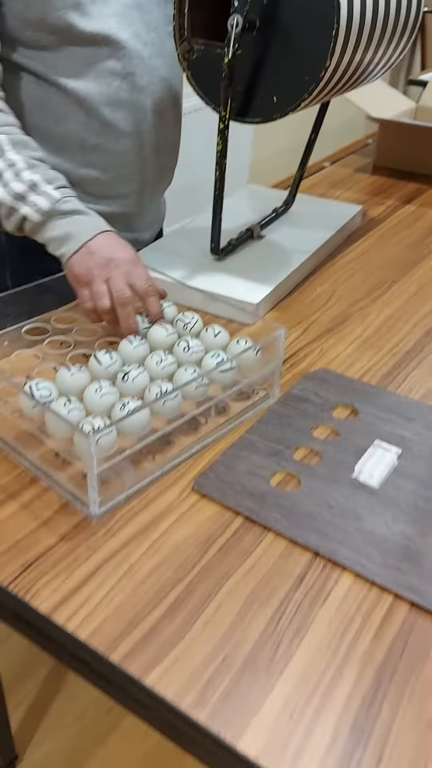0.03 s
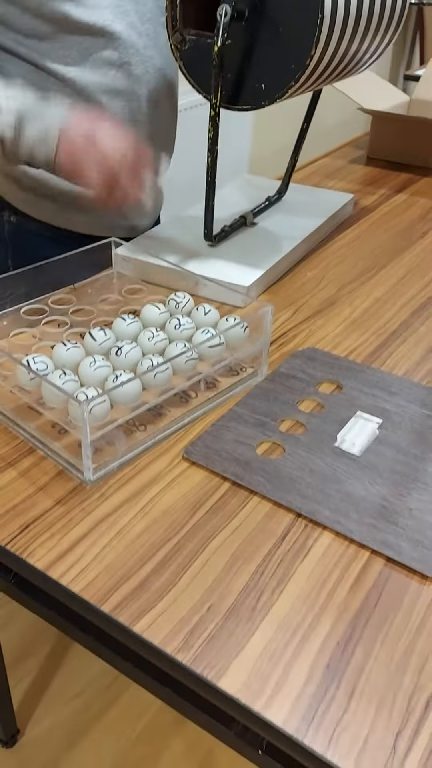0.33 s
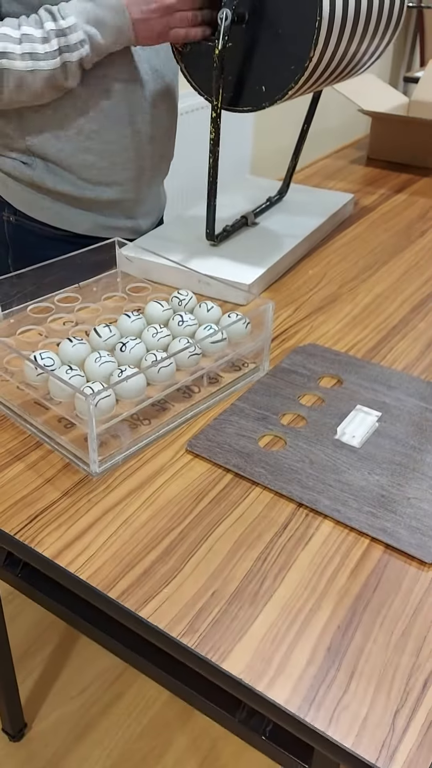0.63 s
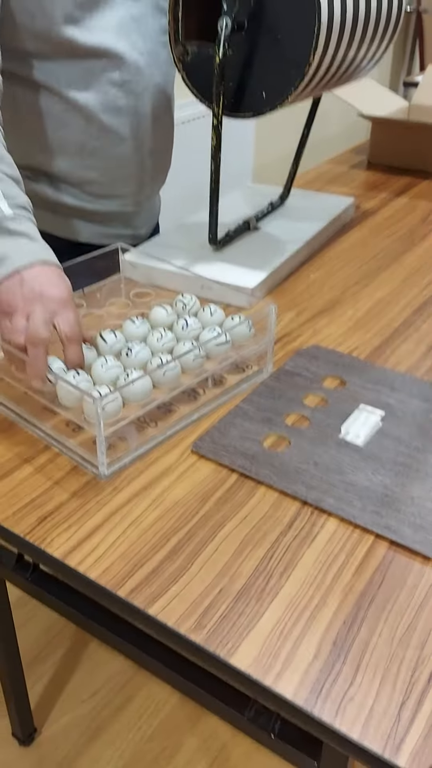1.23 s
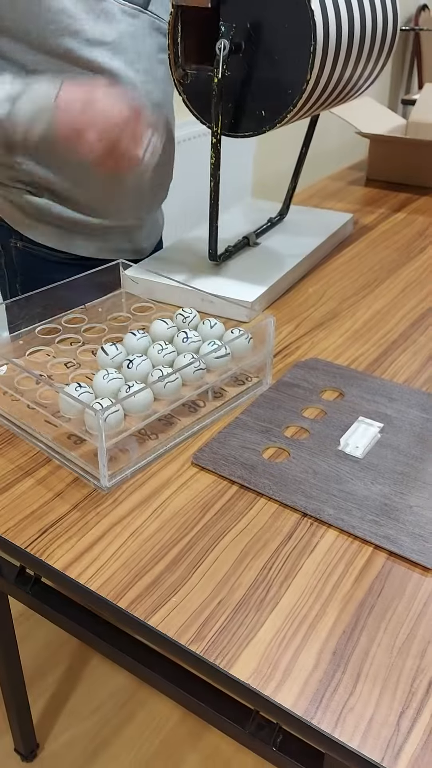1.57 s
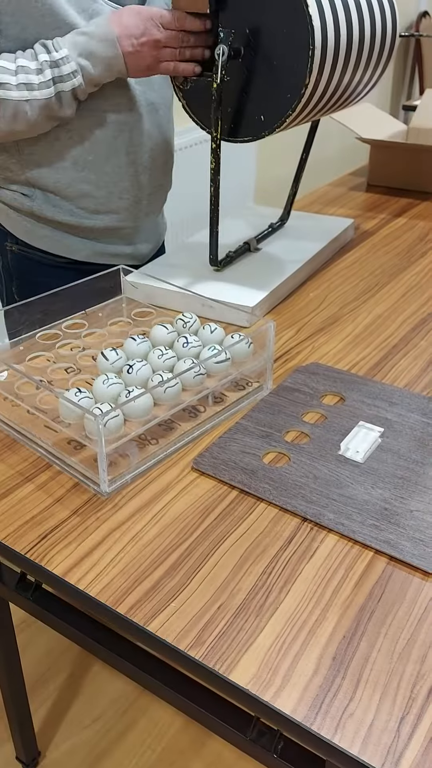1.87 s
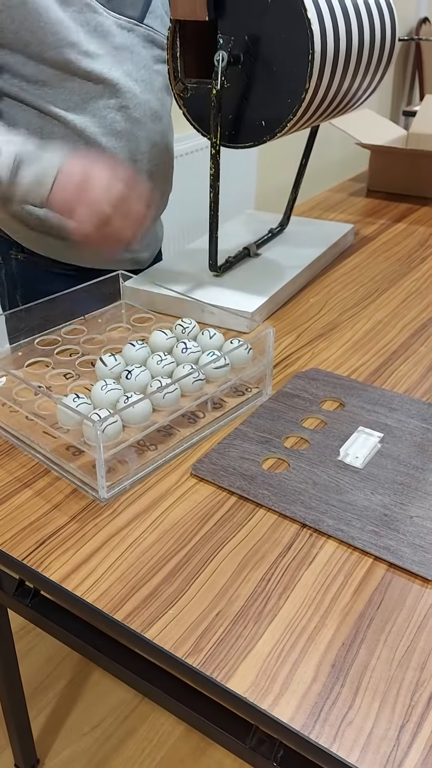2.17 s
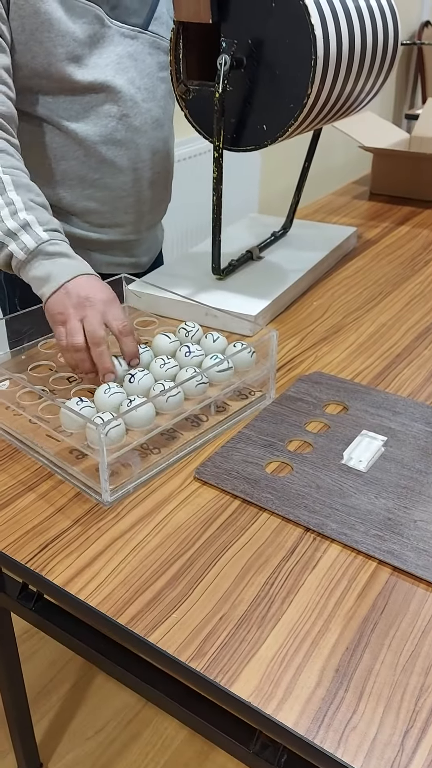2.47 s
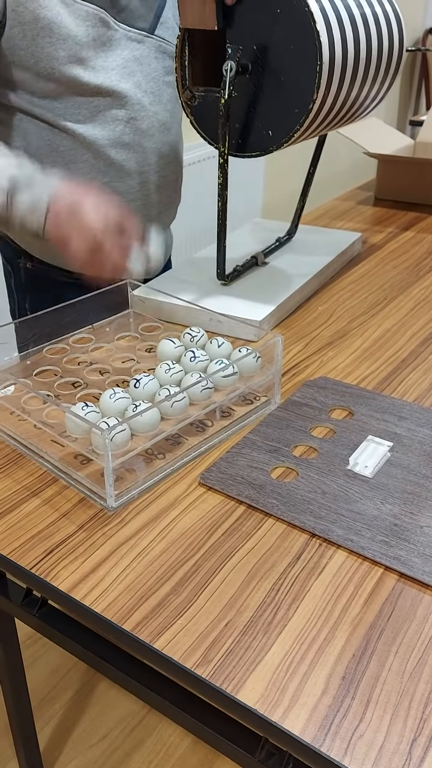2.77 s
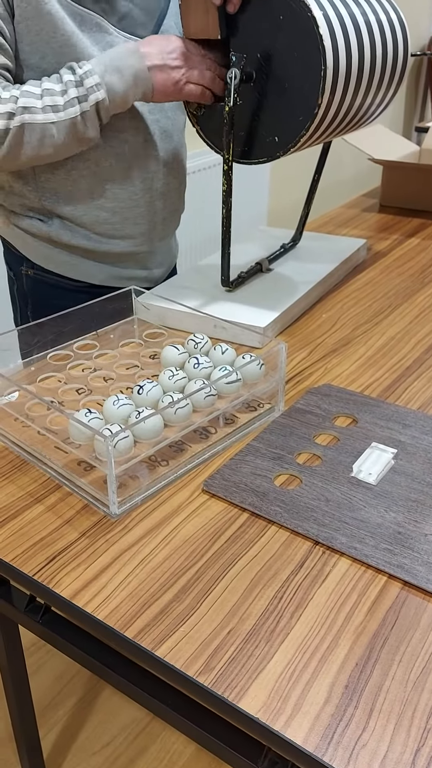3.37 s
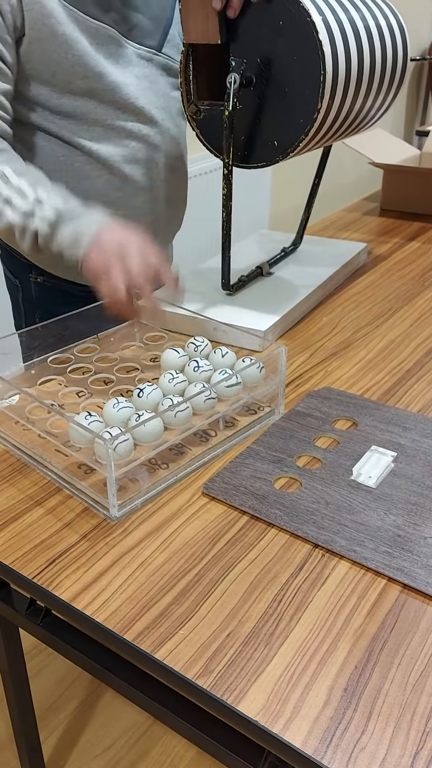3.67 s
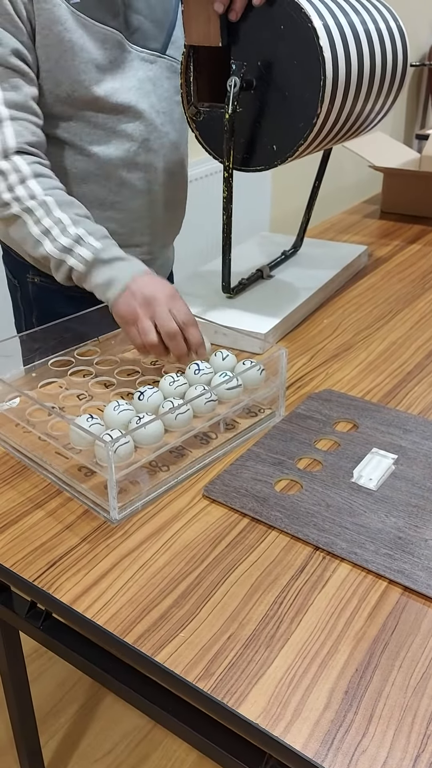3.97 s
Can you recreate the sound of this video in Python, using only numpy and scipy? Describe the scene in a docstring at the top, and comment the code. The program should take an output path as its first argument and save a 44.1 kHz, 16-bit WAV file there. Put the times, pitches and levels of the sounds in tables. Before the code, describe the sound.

Small balls rattle inside a hollow lottery drum, dropped in through a knocking wooden hatch.

```python
"""Fingers knock light, hard balls about in a plastic tray. Three times a wooden hatch knocks and a ball
drops into a hollow lottery drum, where it bounces, clacks and rolls among the others; the hand goes back
to the tray. Each blow on a body is a contact pulse, a short dense ring and mostly a few clear modes.
A bare, ringing room with faint noise surrounds a two-port microphone about a metre away."""
import sys
import numpy as np
from scipy import signal
from scipy.fft import rfft, irfft, next_fast_len
from scipy.io import wavfile
from scipy.ndimage import uniform_filter1d

SR = 44100
rng = np.random.default_rng(int(sys.argv[2]) if len(sys.argv) > 2 else 0)


def file_out(sig):
    """Save sig as 16-bit WAV at sys.argv[1]."""
    # one column per channel
    cols = np.atleast_2d(sig).T
    # limit, then scale
    lim = np.clip(cols, -1, 1)
    pcm = np.round(lim * 32767).astype(np.int16)
    wavfile.write(sys.argv[1], SR, pcm)


N = 176400
RING_TIME_S = np.arange(16384) / SR

# room noise spectrum; gains of direct path, early echoes, tail (f/Hz, level/dB)
AIR_SPECTRUM = [(12, -47), (25, -28), (50, -37), (90, 4.5), (140, 3.5), (300, 5.5), (600, -10),
                (1500, -2.5), (4000, -37), (11000, -28.5), (16000, -8)]
DIRECT_EQ = [(300, 0), (900, -2.5), (5000, -2.5)]
EARLY_EQ = [(150, -10), (700, .5), (8000, -1.5)]
TAIL_EQ = [(100, -3.5), (300, 3.5), (800, 2), (2000, 0), (6000, 3), (12000, -3)]
# tail decay (f/Hz, t60/s)
TAIL_DECAY = [(100, 0.9), (260, 0.8), (700, 0.59), (1800, 0.46), (5000, 0.66), (12000, 0.47)]
# left minus right; microphone response (f/Hz, level/dB)
BALANCE_EQ = [(100, 2), (280, -2), (600, -1.5), (1100, 1.5), (4000, 0.5), (8000, -1), (14000, 5.5)]
MIC_EQ = [(20, -15), (45, 0.5), (4400, 1), (5400, 0), (7000, -1.5), (8300, 4.5), (9050, 5.5), (9350, -8.5),
          (9900, 3), (12500, 4), (14000, -6), (15800, -17)]

# spectral shape of each dense ring (f/Hz, level/dB)
TICK_SPECTRUM = [(2500, -42), (3700, 0.5), (8300, -2), (11000, -8)]
TRAY_SPECTRUM = [(15, -72), (60, -6), (150, -12.5), (260, -6.5), (550, 0.5), (1400, 2), (1950, 0.5),
                 (2700, -10.5), (6000, -24), (11000, -17.5), (16000, -11.5)]
HATCH_SPECTRUM = [(20, -47), (70, -63), (140, -11), (260, -0.5), (550, -0.5), (900, -26), (1500, 7),
                  (2400, -10.5), (4000, -16), (6500, -21.5), (11000, -13.5), (16000, -17)]
SHELL_SPECTRUM = [(200, -25), (1100, 3), (1900, 3), (2500, -6), (3500, -9), (4300, 1), (5200, -9),
                  (7400, 0.5), (10000, -11.5), (16000, -17)]
CLACK_SPECTRUM = [(1000, -18.5), (3000, -9), (6000, -15.5), (10000, -15), (16000, -10.5)]
DRUM_SPECTRUM = [(20, -31), (60, -65), (130, -17.5), (380, -18.5), (560, -0.5), (760, -10.5), (1100, 1.5),
                 (1650, 0), (2300, -6.5), (4000, -15), (6500, -29.5), (11000, -13.5), (16000, -13.5)]
# clear modes (f/Hz, level/dB re dense ring, t60/s)
TRAY_MODES = [(125.3, -22, 0.3), (182, -22, 0.2), (345, -17, 0.08), (1146, -10, 0.034), (1464, -7, 0.03),
              (1867, -13, 0.05)]
HATCH_MODES = [(142, -8, 0.14), (178, -11, 0.08), (233.5, -20, 0.12), (323, -15, 0.06), (841, -4, 0.02),
               (916, -6, 0.03), (1136, -9, 0.03), (1421, -7, 0.035)]
FRAME_MODES = [(146, -9, 0.2), (231, -13, 0.25), (350, -9, 0.12), (1205, -12, 0.15), (1425, -11, 0.3),
               (1745, -11, .2), (1943, -7, 0.4)]
THIN_MODES = [(2500, -9, .06), (2630, -9, .12), (2790, -9, .06)]
DRUM_MODES = [(141, -25, 0.6), (190, -30.5, 0.5), (313.4, -25, 0.2), (535, -14, 0.15), (577, -11, 0.21),
              (721, -21, .1), (892, -11, 0.087), (995, -15, 0.08), (1135, -14, 0.064), (1450, -16, 0.055),
              (2560, -18, 0.059)]
# ball shell modes, relative to each click (f ratio, level/dB, t60 ratio)
SHELL_MODES = [(1, -8, 1), (.985, -8, .4), (1.035, -9, .25), (.96, -9, .25), (1.8, -10, .25)]

# faint, short, high ticks of fingers or cloth (t/s, level/dB)
FAINT_TICKS = [(.4, -34), (2.823, -39.5), (2.856, -35.5), (2.882, -44), (3.751, -19)]
# blows on tray and hatch (t/s, level/dB, treble/dB, bass/dB)
TRAY_TAPS = [(.001, 6, 0, 8.5), (.008, -6, -3, 11), (.024, -2.5, 5, -11), (.055, -12, -8, 20),
             (.08, -5.5, -1, -24), (.132, -21.5, 16.5, -1), (.155, -13.5, -18, -3.5), (.454, -26.5, 2, -13),
             (1.143, 1, -3.5, 1.5), (1.184, -2, -5, 12.5), (1.24, -12, 4, 19), (1.833, 3.5, -11, -31),
             (2.249, -2.5, -7, -24), (2.362, 4.5, -26, -6), (2.368, -5.5, 0.5, 6), (3.759, -5, -1, -2),
             (3.771, -2.5, 2.5, 9), (3.79, -7, 7.5, 7), (3.834, -2.5, 7, 0.5), (3.868, -19, 16, 19.5),
             (3.915, -18.5, 21.5, 23)]
HATCH_KNOCKS = [(.544, -17.5, 7, 4), (.572, -8, 4.5, 8.5), (.581, -6, 1, 4.5), (1.718, -8.5, 5.5, 5.5),
                (1.7515, 3, -4.5, -5.5), (1.769, -8, 1, 12), (3.014, -9, -16, -39), (3.022, -4, 5, -18),
                (3.097, -7.5, -3, -1)]
# hard hit on the hatch frame; light taps and bounces in the drum (t/s, level/dB, treble/dB)
FRAME_HITS = [(3.014, -5, -3)]
THIN_TAPS = [(1.351, -25, -2), (1.453, -10.5, 6.5), (1.523, -31, 12), (1.569, -17, 5), (1.605, -17, 1)]
DRUM_BOUNCES = [(.678, -3.5, -1.5), (.717, 0, -1), (.728, -0.5, 6), (.788, -5, -8), (.821, -3.5, -2.5),
                (.85, -7, -5), (0.887, -6, -3), (.918, -0.5, -7), (.926, -9.5, 0.5), (.987, -4.5, -0.5),
                (1.037, -7.5, 4), (1.048, -4, -6.5), (1.068, -19, -17), (1.101, -10.5, -8),
                (1.197, -5, 2.5), (1.218, -8, -4), (1.265, -9, -5.5), (1.351, -9.5, -1.5),
                (1.453, -10, -35), (1.523, -10, -7), (1.849, 0, -3), (1.915, -4, -1.5), (1.928, -1, -14),
                (1.992, -6.5, 6), (2, -5, 2.5), (2.008, 5, -7.5), (2.018, -13, -21), (2.096, -1.5, -1.5),
                (2.161, -10.5, 3), (2.182, -5.5, -4.5), (2.284, -7.5, 0.5), (2.409, -8.5, 1.5),
                (2.488, -14, 1), (2.543, -18, 3), (3.17, -5.5, -2), (3.182, -4.5, -1.5), (3.205, -7.5, -4),
                (3.312, 0.5, -8), (3.393, -10.5, -10), (3.432, -3.5, 2.5), (3.455, -10, -6),
                (3.525, -12, -9), (3.561, -16.5, 0)]
# shell against an edge (t/s, level/dB, f/Hz, mode level/dB, t60/s)
SHELL_CLICKS = [(3.0126, -5, 4385, -5, .12), (3.31, -5, 4080, 2, .03)]
# rolling envelope (t/s, level/dB)
ROLL_ENVELOPE = [(0, -29.5), (.15, -45), (.35, -89.5), (.68, -96.5), (.76, -39), (1.05, -38.5),
                 (1.3, -54.5), (1.6, -54.5), (1.721, -55), (1.87, -54), (2.15, -43), (2.401, -44.5),
                 (2.66, -60), (3.099, -93), (3.19, -51.5), (3.48, -40.5), (3.62, -52.5), (3.98, -53.5)]

DRUM_T60_S, HATCH_T60_S, TRAY_T60_S, SHELL_T60_S = .05, .035, .035, .035  # dense ring
DRUM_SNAP, HATCH_SNAP, TRAY_SNAP, SHELL_SNAP = .45, 1, .35, .5  # contact pulse re dense ring
DRUM_DB, HATCH_DB, TRAY_DB, SHELL_DB, THIN_DB = -2.5, -2.5, -5.5, 2, -9.5


def undb(db):
    """dB to gain."""
    return 10 ** (np.asarray(db) / 20)


def unit(x):
    """Scale to unit energy."""
    return x / np.sqrt(np.sum(x ** 2))


def at(points, hz):
    """Interpolate a table over log frequency."""
    p = np.array(points, float)
    return np.interp(np.log(np.maximum(hz, 1)), np.log(p[:, 0]), p[:, 1])


def fade(t, t60_s):
    """Exponential decay."""
    return np.exp(-np.log(1000) * t / max(t60_s, 1e-3))


def shape(x, db_of_hz):
    """Minimum-phase filter from a gain curve."""
    n = 2 * next_fast_len(x.shape[-1])
    cepstrum = irfft(np.log(undb(db_of_hz(np.arange(n // 2 + 1) * SR / n))), n)
    cepstrum[1:n // 2] *= 2
    cepstrum[n // 2 + 1:] = 0
    return irfft(rfft(x, n) * np.exp(rfft(cepstrum)), n)[..., :x.shape[-1]]


def colour(x, points):
    """Filter by (f/Hz, level/dB) points."""
    return shape(x, lambda hz: at(points, hz))


def flatten(x, width_hz=160):
    """Level the chance humps in a noise spectrum."""
    def inverse_db(hz):
        power = np.abs(rfft(x, 2 * (len(hz) - 1))) ** 2
        smooth = uniform_filter1d(np.atleast_2d(power).mean(0), max(3, int(width_hz / hz[1])))
        return -10 * np.log10(smooth / smooth.mean() + 1e-9)
    return shape(x, inverse_db)


def add(out, t_s, sound):
    """Mix in at t_s."""
    i = int(np.clip(t_s * SR, 0, N - 1))
    out[i:i + len(sound)] += sound[:N - i]


def noise_burst(t60_s):
    """Decaying noise, unit energy."""
    return unit(rng.standard_normal(len(RING_TIME_S)) * fade(RING_TIME_S, t60_s))


def strike(spectrum, modes, t60_s, snap, wander=.0028, scatter_db=1.8):
    """One blow: pulse, dense ring, modes. Mode level, sign and pitch vary with the striking point."""
    burst = noise_burst(t60_s)
    burst[0] += snap
    out = unit(colour(flatten(burst), spectrum))
    for hz, db, mode_t60_s in modes:
        size, detune, side = rng.standard_normal(3)
        mode = np.sin(2 * np.pi * hz * (1 + wander * detune) * RING_TIME_S) * fade(RING_TIME_S, mode_t60_s)
        out += np.sign(side) * undb(db + scatter_db * size) * unit(mode)
    return out


def contact(x, treble_db=0, bass_db=0, treble_hz=3540, bass_hz=365):
    """Two shelves: harder contacts are brighter, heavier ones carry more bass."""
    return shape(x, lambda hz: treble_db * hz ** 2 / (hz ** 2 + treble_hz ** 2)
                 + bass_db / (1 + (hz / bass_hz) ** 4))


def blows(table, *body, **options):
    """Play a table of blows on one body."""
    out = np.zeros(N)
    for t_s, db, *shelves_db in table:
        add(out, t_s, undb(db) * contact(strike(*body, **options), *shelves_db))
    return out


def diffuse(alike_hz=450):
    """Noise from all sides at two ports: alike in the bass, unrelated above."""
    def side_power(hz):
        return 1e-3 + hz ** 4 / (hz ** 4 + alike_hz ** 4)
    mid, side = rng.standard_normal((2, N))
    mid = shape(mid, lambda hz: 10 * np.log10(2 - side_power(hz)))
    side = shape(side, lambda hz: 10 * np.log10(side_power(hz)))
    return np.array([mid + side, mid - side]) / np.sqrt(2)


def room_noise(level_db=-61):
    """Faint, steady diffuse noise."""
    return undb(level_db) * np.sqrt(2 * N) * unit(colour(diffuse(), AIR_SPECTRUM))


def room(x, wet_db=0, port_lag_s=.00029, early_t60_s=.035, build_s=.018):
    """Direct sound reaches the left port first; table and walls add early echoes and a tail."""
    t, hz = np.arange(N) / SR, np.arange(N // 2 + 1) * SR / N
    field, tail = rfft(diffuse()), 0
    for band_hz, t60_s in TAIL_DECAY:
        band = at([(f, f == band_hz) for f, _ in TAIL_DECAY], hz)
        envelope = unit(fade(t, t60_s) * (1 - np.exp(-t / build_s)))
        tail += irfft(field * band, N) * envelope
    tail = colour(flatten(tail, width_hz=35), TAIL_EQ)
    early = colour(flatten(diffuse() * unit(fade(t, early_t60_s))), EARLY_EQ)
    direct = np.zeros((2, N))
    direct[0, 0] = direct[1, round(port_lag_s * SR)] = 1
    response = colour(direct, DIRECT_EQ) + undb(wet_db) * (tail + early)
    return signal.fftconvolve(x[None], response, axes=1)[:, :N] / np.sqrt(2)


def tray():
    """Fingers knock balls about the plastic tray; fingers or cloth add faint, short, high ticks."""
    taps = blows(TRAY_TAPS, TRAY_SPECTRUM, TRAY_MODES, TRAY_T60_S, TRAY_SNAP)
    ticks = blows(FAINT_TICKS, TICK_SPECTRUM, modes=[], t60_s=.015, snap=.5)
    return undb(TRAY_DB) * taps + ticks


def hatch():
    """The wooden hatch knocks; one hard hit rings its frame."""
    knocks = blows(HATCH_KNOCKS, HATCH_SPECTRUM, HATCH_MODES, HATCH_T60_S, HATCH_SNAP)
    frame = blows(FRAME_HITS, HATCH_SPECTRUM, FRAME_MODES, HATCH_T60_S, HATCH_SNAP)
    return undb(HATCH_DB) * knocks + frame


def shell_clicks():
    """A ball's thin shell rings high on meeting a hard edge."""
    out = np.zeros(N)
    for t_s, db, hz, ring_db, t60_s in SHELL_CLICKS:
        modes = [(hz * ratio, mode_db + ring_db, t60_s * share) for ratio, mode_db, share in SHELL_MODES]
        add(out, t_s, undb(db) * strike(SHELL_SPECTRUM, modes, SHELL_T60_S, SHELL_SNAP, wander=0))
    return undb(SHELL_DB) * out


def clacks(count=4, gap_s=.0035, loss_db=2):
    """Each bounce knocks on through neighbouring balls: a quick run of weakening ticks."""
    out = np.zeros(N)
    for t_s, db, treble_db in DRUM_BOUNCES:
        for k in range(count):
            add(out, t_s, undb(db + treble_db - k * loss_db) * noise_burst(t60_s=.006))
            t_s += gap_s * (.5 + rng.random())
    return colour(out, CLACK_SPECTRUM)


def rolling(spots=4, contacts_per_s=200, scatter_db=8):
    """Rolling, settling balls make many tiny contacts at several spots on the drum wall."""
    envelope = undb(np.interp(np.arange(N) / SR, *np.array(ROLL_ENVELOPE).T))
    out = np.zeros(N)
    for _ in range(spots):
        hits = rng.random(N) < contacts_per_s / spots / SR
        ticks = hits * undb(scatter_db * (2 * rng.random(N) - 1))
        force = unit(ticks) * np.sqrt(N / spots) * envelope
        wall = strike(DRUM_SPECTRUM, DRUM_MODES, DRUM_T60_S, DRUM_SNAP)
        wall = unit(contact(wall, treble_db=-9.5, bass_db=-4))
        out += signal.fftconvolve(force, wall)[:N]
    return out


def drum_bounces():
    """Balls strike the hollow drum, whose modes shift as they move about; light taps ring thinly."""
    bounces = blows(DRUM_BOUNCES, DRUM_SPECTRUM, DRUM_MODES, DRUM_T60_S, DRUM_SNAP, wander=.018)
    taps = blows(THIN_TAPS, DRUM_SPECTRUM, THIN_MODES, TRAY_T60_S, TRAY_SNAP)
    return undb(DRUM_DB) * bounces + undb(THIN_DB) * taps


def scene():
    """Drum, hatch, balls and tray, each with its own room response, over room noise."""
    sources = [(drum_bounces() + rolling(), -1.5), (hatch(), -1.5),
               (clacks() + shell_clicks(), -4), (tray(), 0)]
    left, right = room_noise() + sum(room(x, wet_db) for x, wet_db in sources)
    return np.array([shape(left, lambda hz: at(BALANCE_EQ, hz) / 2),
                     shape(right, lambda hz: -at(BALANCE_EQ, hz) / 2)])


def record(dry):
    """The microphone ports notch and lift the treble; low-pass at 16 kHz."""
    lowpass = signal.ellip(8, .2, 70, 16000, fs=SR, output="sos")
    return signal.sosfilt(lowpass, colour(dry, MIC_EQ))


dry = scene()
out = record(dry)
file_out(out)
```